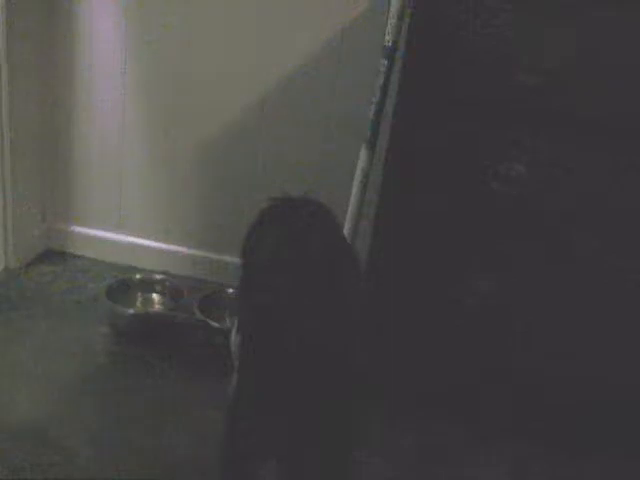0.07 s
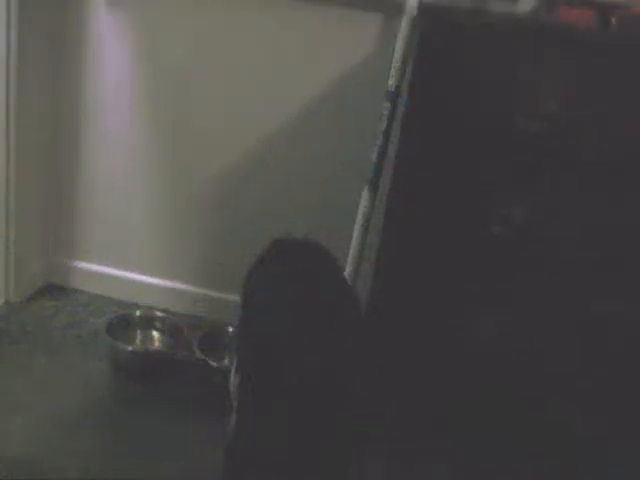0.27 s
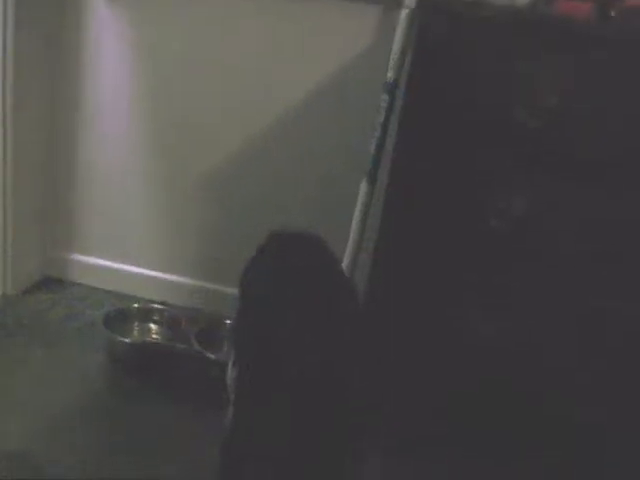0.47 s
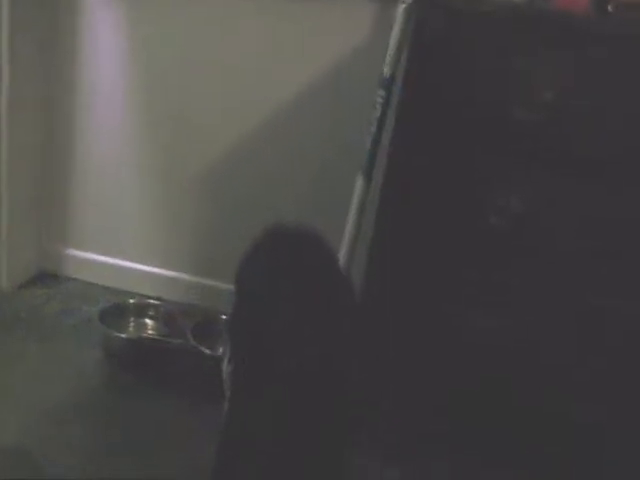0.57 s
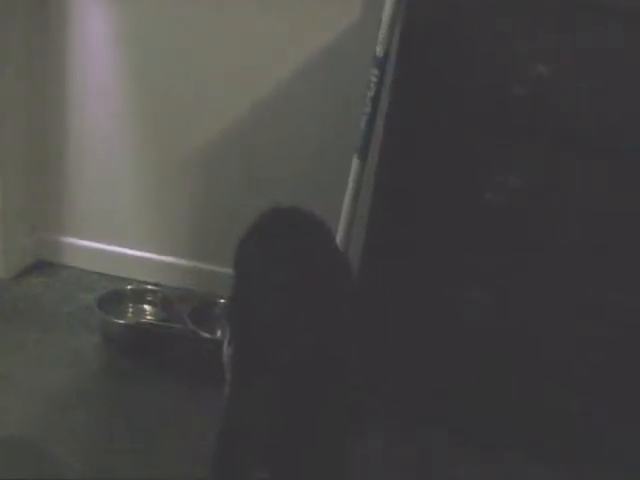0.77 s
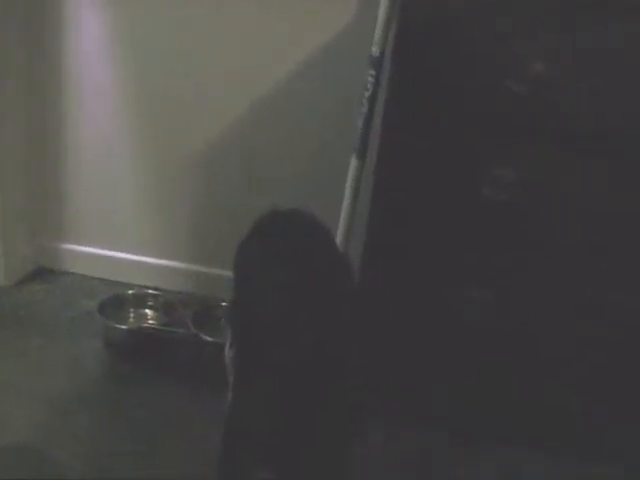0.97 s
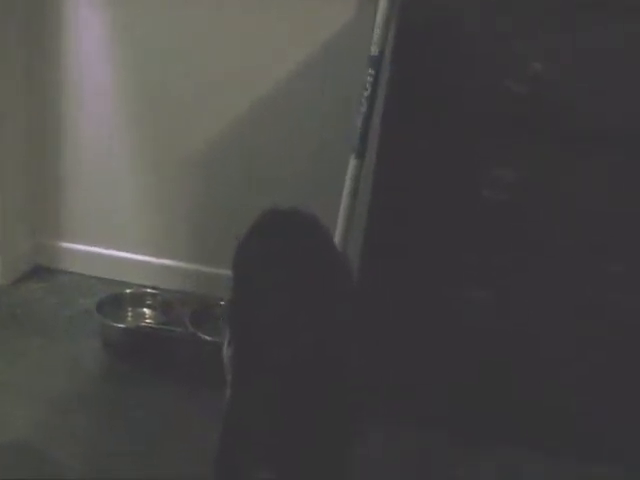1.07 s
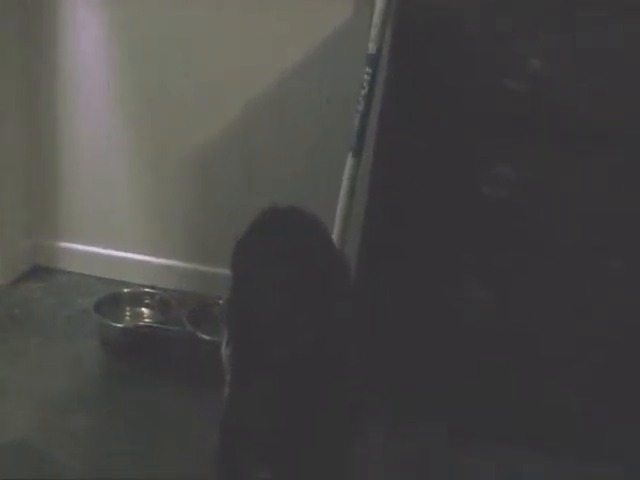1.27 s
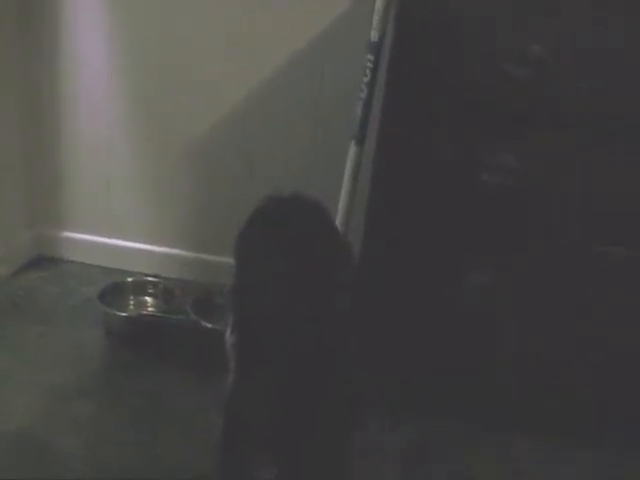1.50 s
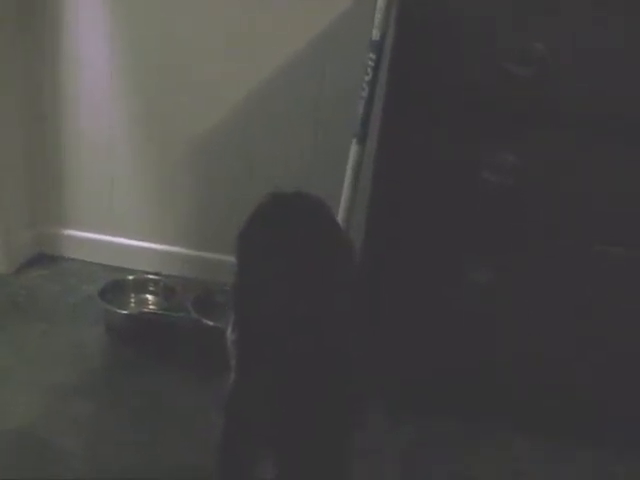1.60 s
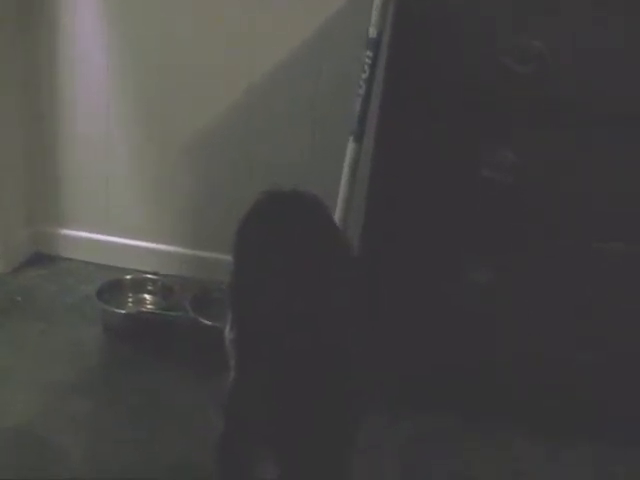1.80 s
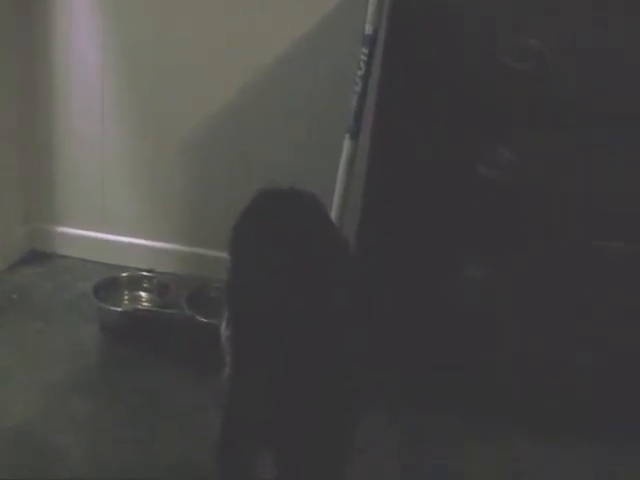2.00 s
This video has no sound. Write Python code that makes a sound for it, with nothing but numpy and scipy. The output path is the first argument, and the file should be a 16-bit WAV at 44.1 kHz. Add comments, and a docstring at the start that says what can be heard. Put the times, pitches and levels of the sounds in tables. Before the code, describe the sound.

A sharp click on a hand-held camera's plastic case rebounds into a dull knock, right at the microphone. Fingers slide and settle, then a few faint rustles pass in a quiet room with steady hiss and thin whine.

```python
"""A sharp click on a hand-held camera's plastic case rebounds and ends in a dull knock.
The hits ring damped case modes, with two early echoes; a faint ring fades beneath.
Fingers slide and settle, the case thuds in the grip; later something soft rustles four times.
Behind it, once the microphone is on: thin electronic whine, preamplifier hiss, mains hum, quiet room."""
import sys
import numpy as np
from scipy import signal
from scipy.fft import rfft, irfft
from scipy.io import wavfile
from scipy.ndimage import uniform_filter1d

SR = 44100
rng = np.random.default_rng(int(sys.argv[2]) if len(sys.argv) > 2 else 0)


def pcm_store(signal):
    """Save signal as 16-bit PCM."""
    levels = np.round(np.clip(np.atleast_2d(signal), -1, 1) * 32767)
    wavfile.write(sys.argv[1], SR, levels.astype(np.int16).T)


N = 90404

# hard ticks to dull knocks (time [s], level [dB], low-pass [Hz], high-pass [Hz], chatter re hit [dB])
CASE_HITS = [(0.183, -24.5, 9000, 4140, -24.5), (0.2015, -28, 13000, 5500, -10),
             (0.2042, -3, 13300, 298, -26.5), (0.2162, -3.5, 4400, 2550, -22), (0.2345, 4, 666, 910, -25.5),
             (0.2557, -37, 6000, 3000, -29), (0.275, -39, 5500, 2000, -18), (0.2983, -28, 8000, 3000, -20),
             (0.3213, -29, 3500, 900, -26), (0.3327, -19.5, 3220, 2200, -17), (0.333, -14, 656, 600, -15)]
# case resonances (frequency [Hz], gain [dB], T60 [s])
CASE_MODES = [(533, -8, 0.0045), (974, -5, 0.0096), (1250, 1.5, 0.0072), (1697, 2.1, 0.0042),
              (2500, -14, 0.0084), (3230, -11.5, 0.0073), (3960, -16, 0.0093), (5220, -8, .0085),
              (6110, -10.5, 0.008), (7005, -14, 0.011), (7860, -8.5, 0.0074), (9400, 4, 0.0022),
              (10520, -5, 0.006), (11870, -10, 0.0039)]
# nearby surfaces (delay [s], gain [dB])
EARLY_ECHOES = [(.0052, -19), (.0083, -24)]
# case shifting in the grip (time [s], level [dB], frequency [Hz], T60 [s])
GRIP_THUDS = [(.167, -34, 70, 0.04), (0.2066, -26, 232, 0.011), (0.2324, -29.5, 182, 0.039),
              (0.2389, -39, 695, 0.039), (.335, -28.5, 545, 0.035), (0.3413, -29, 238, 0.038),
              (1.133, -45, 62, 0.18), (1.534, -41, 56.6, 0.036)]
# finger strokes (peak time [s], rise [s], fall [s], level [dB])
FINGER_SLIDES = [(0.167, 0.0034, 0.0068, -54), (.236, 0.0044, 0.0066, -37.5), (.271, 0.012, .01, -36.5),
                 (.305, 0.0087, 0.013, -39), (0.346, 0.0084, 0.009, -34.5), (0.374, .002, 0.0066, -49)]
# finger friction (frequency [Hz], relative density [dB])
SLIDE_SPECTRUM = [(59, -30), (100, -4), (983, -1), (1960, -4.5), (2990, -8.5), (3250, -8.5), (5260, -8.5),
                  (5840, -4), (8700, -7.5), (9460, -3.5), (15000, -23)]
# soft brushes (peak time [s], rise [s], fall [s], swish level [dB], body level [dB])
RUSTLE_STROKES = [(1.075, 0.016, 0.025, -53.5, -55), (1.222, 0.014, 0.054, -47, -58),
                  (1.45, 0.031, .04, -67, -59), (1.688, 0.0079, 0.018, -46.5, -48.5)]
# bright part of a rustle (frequency [Hz], relative density [dB])
SWISH_SPECTRUM = [(300, -6), (800, 2.5), (1400, -1.5), (2500, -1.5), (3500, -0.5), (4200, 2), (5500, 1),
                  (6500, -8), (12000, -16)]
# dull part of a rustle (frequency [Hz], relative density [dB])
BODY_SPECTRUM = [(60, -10), (150, -3), (300, -3.5), (700, -7), (1500, -32), (4000, -30)]
# preamplifier noise (frequency [Hz], relative density [dB])
HISS_SPECTRUM = [(4000, -32), (5200, -17), (5750, -3), (6200, -13), (6650, -7), (7050, -9), (8200, -2.5),
                 (9100, -13), (10000, 3.5), (10700, -7.5), (11400, -8), (12600, -18.5), (14500, -11.5),
                 (15500, -16)]
# mains partials (harmonic number, rms level [dB])
HUM_HARMONICS = [(1, -62), (2, -67), (4, -60.5), (6, -68), (8, -73), (10, -69)]
# room air (frequency [Hz], relative density [dB])
ROOM_SPECTRUM = [(20, -10), (40, 1.5), (60, -23), (90, 1.5), (150, -3), (200, -1.5), (330, 0), (450, -1.5),
                 (800, -2), (1500, -4), (3000, -6.5), (5000, -8.5)]


def case_clicks(chatter_decay_s=.0015, lag_at_1khz_s=.0002, overload_limit=.8):
    """Hits with brief chatter drive the same damped modes; the loudest click overloads."""
    t, force = time_s(), np.zeros(N)
    for at_s, db, lowpass_hz, highpass_hz, chatter_db in CASE_HITS:
        decay = (t > at_s) * np.exp(-np.minimum(abs(t - at_s) / chatter_decay_s, 20))
        hit = gain(chatter_db) * rng.standard_normal(N) * decay
        hit[int(at_s * SR)] += 1
        hit = butterworth(hit, lowpass_hz, "low")
        force += gain(db) * butterworth(hit, highpass_hz, "high", order=1)
    modes = sum((-1) ** k * gain(db) * struck_mode(0, hz, t60_s)
                for k, (hz, db, t60_s) in enumerate(CASE_MODES))
    bins_hz = np.arange(N // 2 + 1) * SR / N
    # bending waves: treble arrives first
    dispersion = np.exp(-4j * np.pi * lag_at_1khz_s * np.sqrt(1000 * bins_hz))
    clicks = irfft(rfft(force) * rfft(modes) * dispersion, N)
    clicks = butterworth(clicks, hz=342, kind="high")
    overloaded = np.clip(clicks, -overload_limit, overload_limit)
    return butterworth(overloaded, hz=12500, kind="low", order=14)


def with_echoes(x):
    """Nearby surfaces add dull, delayed copies."""
    t, dull = time_s(), butterworth(x, hz=2520, kind="low")
    return x + sum(gain(db) * np.interp(t - delay_s, t, dull) for delay_s, db in EARLY_ECHOES)


def grip_thuds():
    """The whole case shifts in the grip: one damped low mode per thud."""
    return sum(gain(db) * struck_mode(at_s, hz, t60_s) for at_s, db, hz, t60_s in GRIP_THUDS)


def faint_ring():
    """One slowly fading mode under the clicks."""
    return gain(db=-45) * struck_mode(at_s=.166, hz=904, t60_s=1.5)


def finger_slides():
    """Fingers rub the case: swells of grainy noise."""
    envelope = sum(gain(db) * swell(at_s, rise_s, fall_s) for at_s, rise_s, fall_s, db in FINGER_SLIDES)
    return envelope * friction_grain() * noise(SLIDE_SPECTRUM)


def rustles():
    """Soft brushes: a bright, grainy swish over a dull body."""
    swish = noise(SWISH_SPECTRUM) * friction_grain()
    body = noise(BODY_SPECTRUM)
    return sum(swell(at_s, rise_s, fall_s) * (gain(swish_db) * swish + gain(body_db) * body)
               for at_s, rise_s, fall_s, swish_db, body_db in RUSTLE_STROKES)


def friction_grain(depth_db=2, rate_hz=680):
    """Uneven rubbing as a fast random gain."""
    flutter = uniform_filter1d(rng.standard_normal(N), int(SR / rate_hz))
    return gain(depth_db * flutter / flutter.std())


def electronic_whine(whine_hz=7560, whistle_hz=11598, frame_hz=30, sag_s=.004, slip_cycles=.3):
    """A whine whose pitch sags once a frame; a fainter steady whistle above."""
    t = time_s()
    since_sag_s = (t - .429) % (1 / frame_hz)
    lag_cycles = slip_cycles * (np.minimum(since_sag_s / sag_s, 1) - since_sag_s * frame_hz)
    return tone(whine_hz * t - lag_cycles, rms_db=-50.8) + tone(whistle_hz * t, rms_db=-67.5)


def preamp_hiss():
    """Steady amplifier noise with treble peaks."""
    return gain(db=-47) * noise(HISS_SPECTRUM)


def mains_hum(mains_hz=60):
    """Mains harmonics at random phases."""
    return sum(tone(round(k) * mains_hz * time_s() + rng.random(), db) for k, db in HUM_HARMONICS)


def room_air():
    """Steady room noise, strongest in the lows."""
    return gain(db=-47.5) * butterworth(noise(ROOM_SPECTRUM), hz=8900, kind="low", order=4)


def gain(db):
    """Decibels to amplitude."""
    return 10 ** (np.asarray(db) / 20)


def time_s():
    """Sample times."""
    return np.arange(N) / SR


def butterworth(x, hz, kind, order=2):
    """Low-pass or high-pass."""
    return signal.sosfilt(signal.butter(order, hz, kind, fs=SR, output="sos"), x)


def noise(spectrum):
    """Unit-rms noise shaped by (frequency [Hz], level [dB]) points."""
    hz, db = np.array(spectrum).T
    bins_hz = np.maximum(np.arange(N // 2 + 1) * SR / N, 1)
    shape_db = np.interp(np.log(bins_hz), np.log(hz), db)
    x = irfft(rfft(rng.standard_normal(N)) * gain(shape_db), N)
    return x / x.std()


def swell(peak_s, rise_s, fall_s):
    """Asymmetric Gaussian envelope."""
    offset_s = time_s() - peak_s
    return np.exp(-.5 * (offset_s / np.where(offset_s < 0, rise_s, fall_s)) ** 2)


def struck_mode(at_s, hz, t60_s):
    """Exponentially decaying sine."""
    age_s = np.maximum(time_s() - at_s, 0)
    decay_db = np.minimum(60 * age_s / t60_s, 400)
    return np.sin(2 * np.pi * hz * age_s) * gain(-decay_db)


def tone(phase_cycles, rms_db):
    """Constant-level sine."""
    return np.sqrt(2) * gain(rms_db) * np.sin(2 * np.pi * phase_cycles)


def scene():
    """Mono sum of all sources."""
    handling = with_echoes(case_clicks()) + grip_thuds() + faint_ring() + finger_slides()
    return (handling + rustles() + mains_hum() + room_air() + preamp_hiss() + electronic_whine())[None]


def record(dry, mic_on_s=.165, cutoff_hz=15420):
    """Silence until the microphone comes on; steep low-pass."""
    lowpass = signal.ellip(14, .1, 80, cutoff_hz, fs=SR, output="sos")
    return signal.sosfilt(lowpass, dry * (time_s() >= mic_on_s))


dry = scene()
out = record(dry)
pcm_store(out)
```